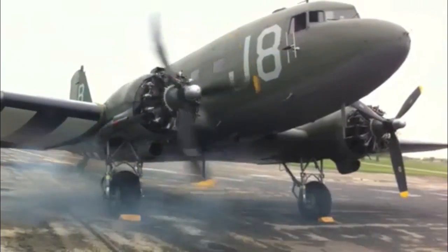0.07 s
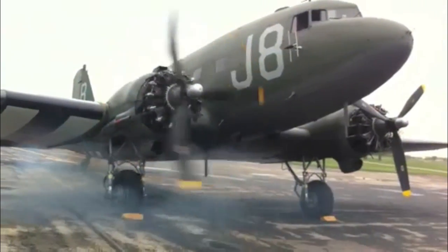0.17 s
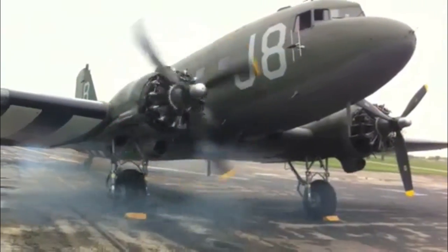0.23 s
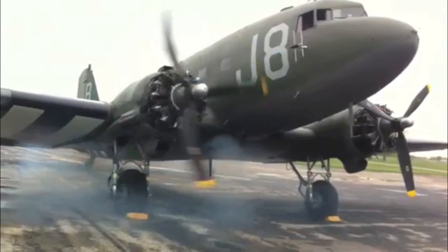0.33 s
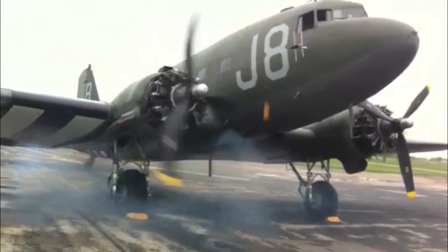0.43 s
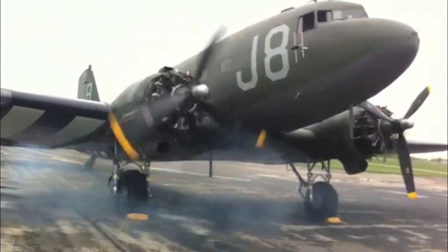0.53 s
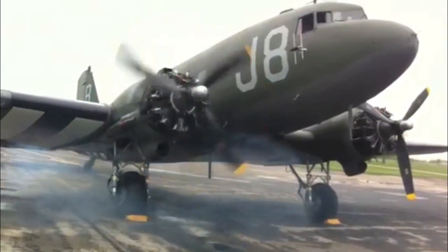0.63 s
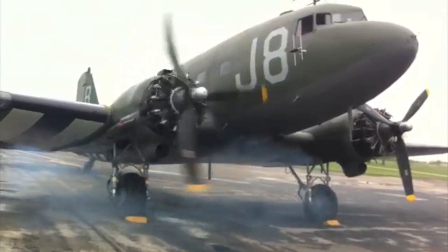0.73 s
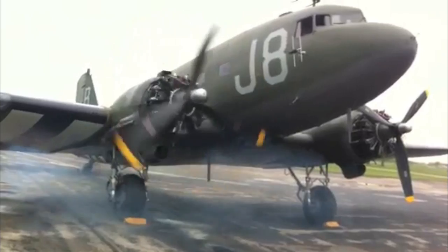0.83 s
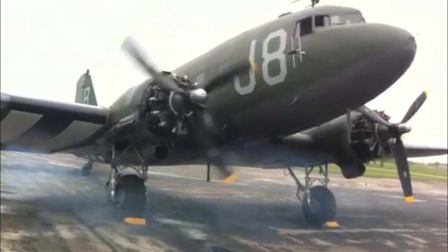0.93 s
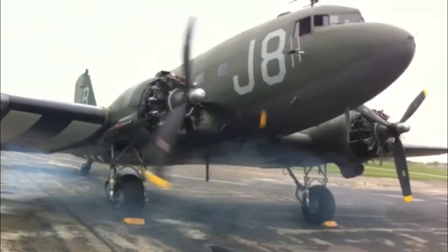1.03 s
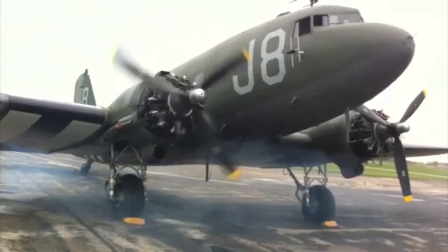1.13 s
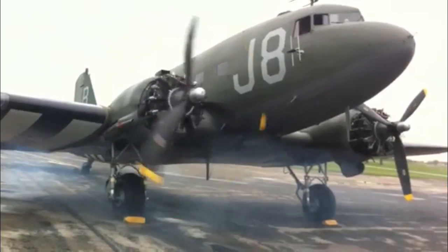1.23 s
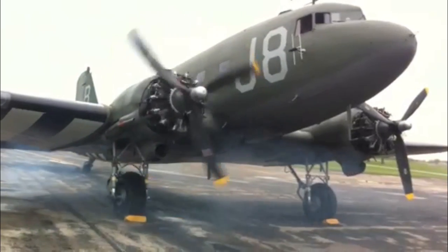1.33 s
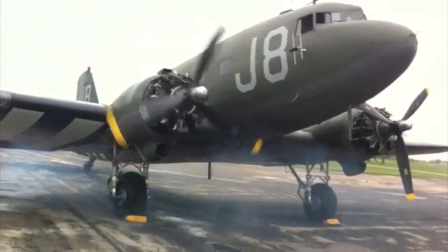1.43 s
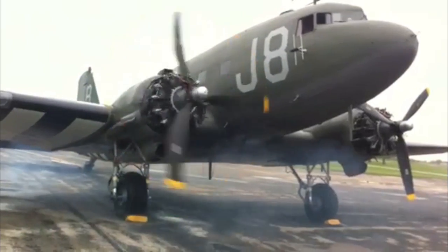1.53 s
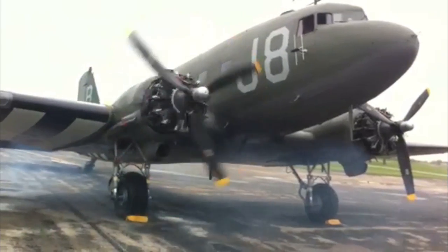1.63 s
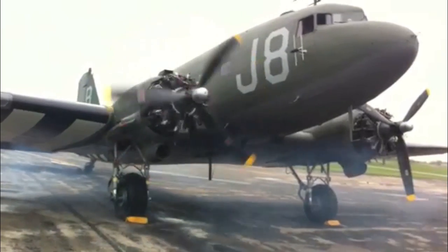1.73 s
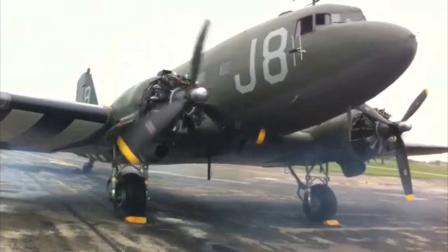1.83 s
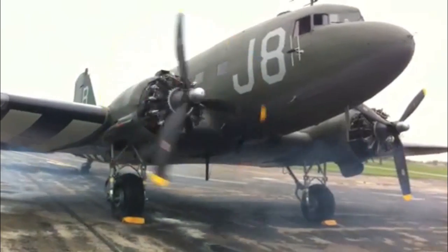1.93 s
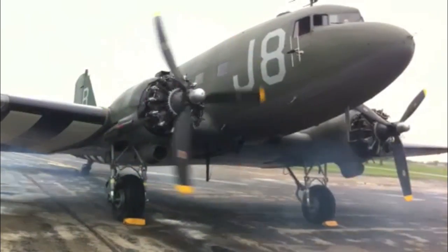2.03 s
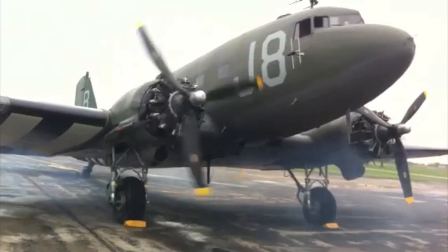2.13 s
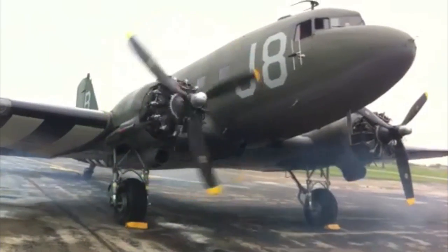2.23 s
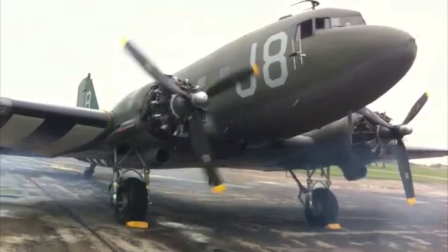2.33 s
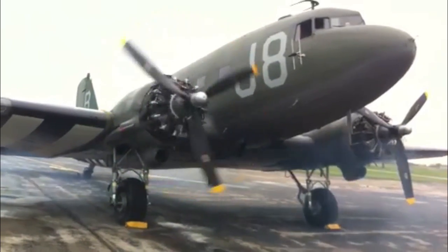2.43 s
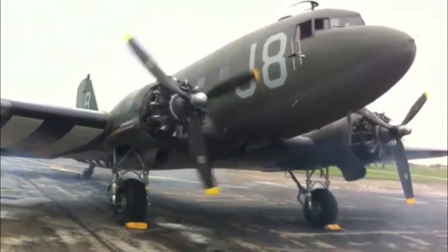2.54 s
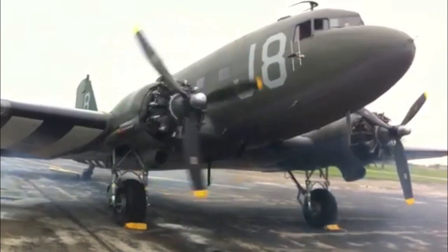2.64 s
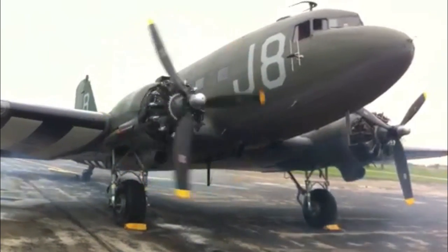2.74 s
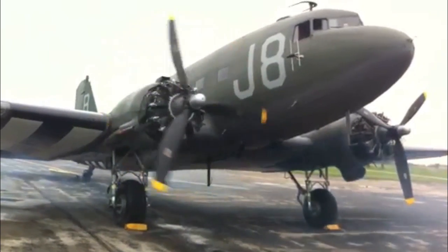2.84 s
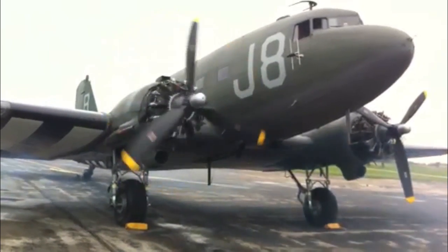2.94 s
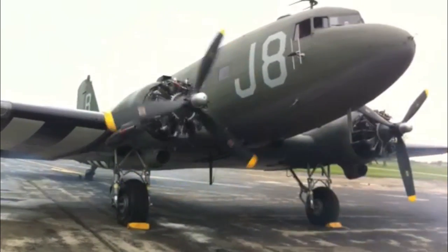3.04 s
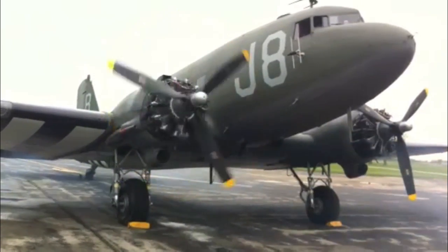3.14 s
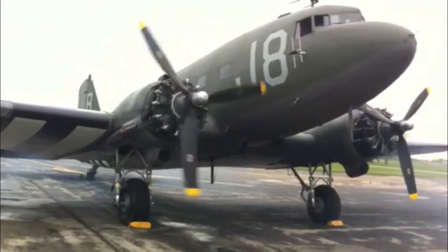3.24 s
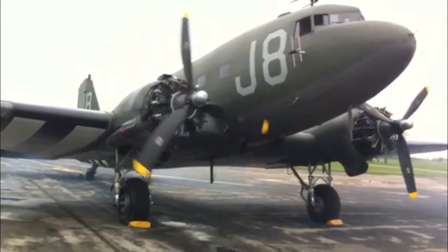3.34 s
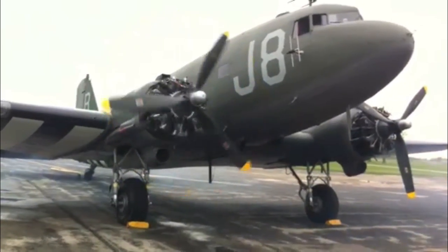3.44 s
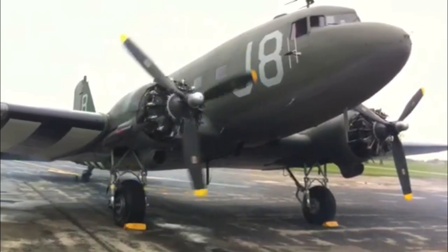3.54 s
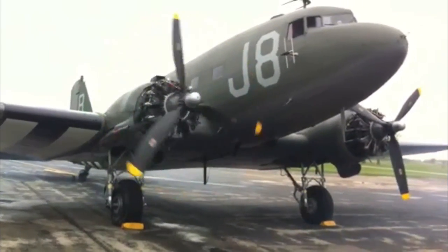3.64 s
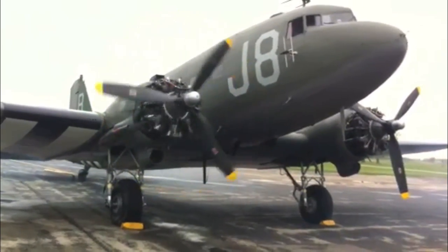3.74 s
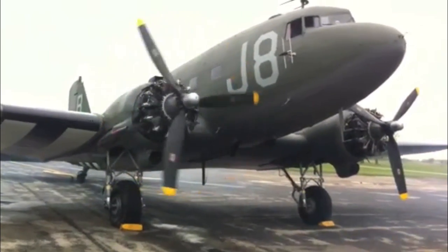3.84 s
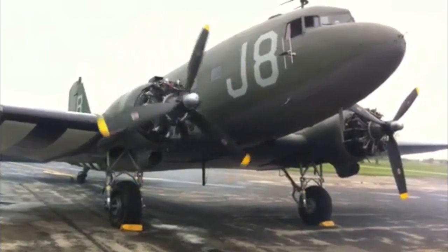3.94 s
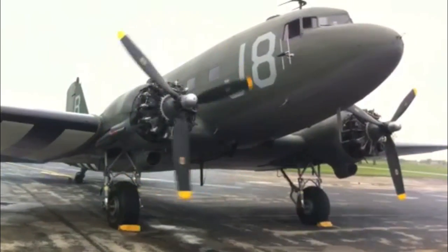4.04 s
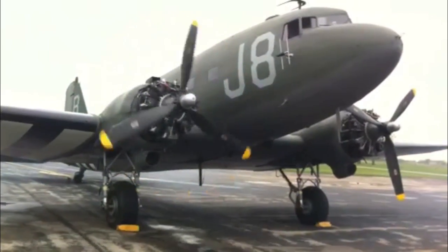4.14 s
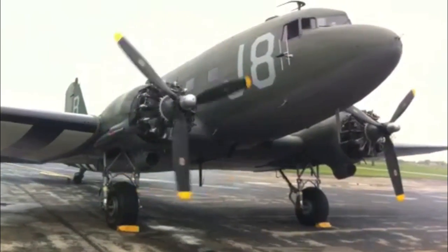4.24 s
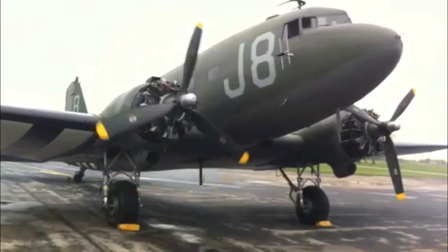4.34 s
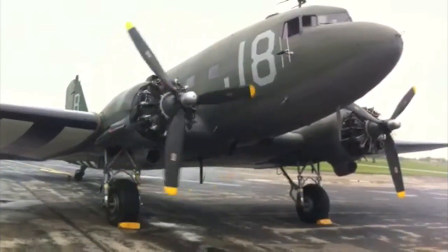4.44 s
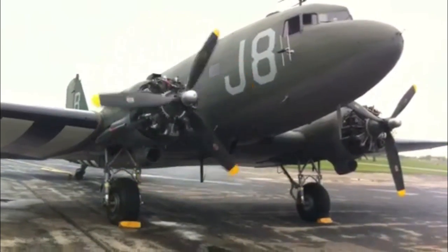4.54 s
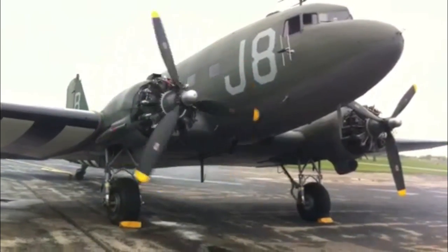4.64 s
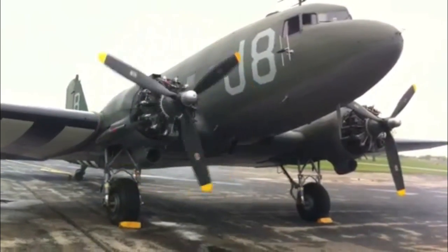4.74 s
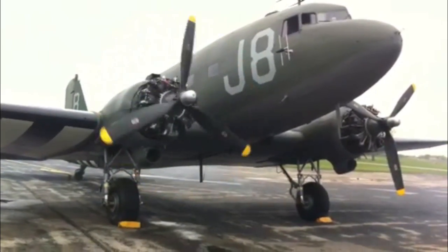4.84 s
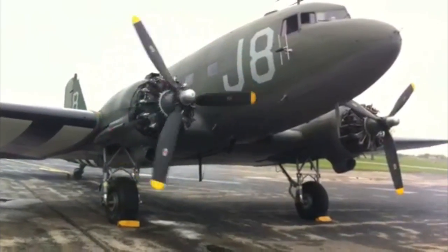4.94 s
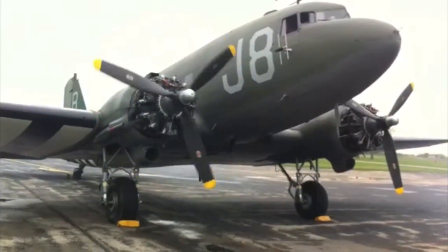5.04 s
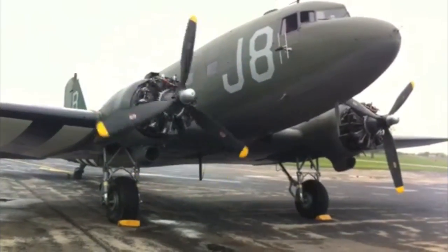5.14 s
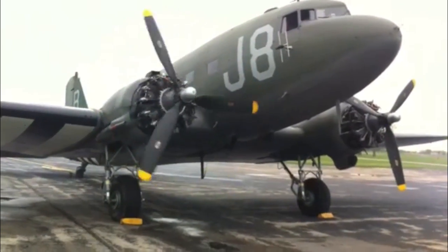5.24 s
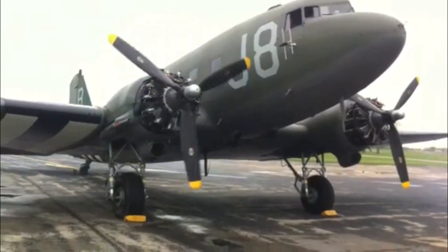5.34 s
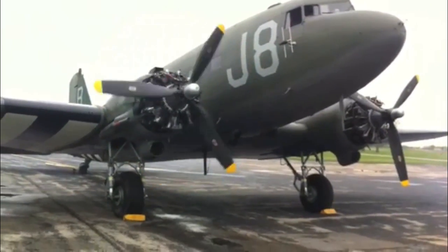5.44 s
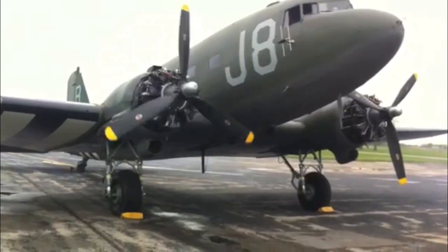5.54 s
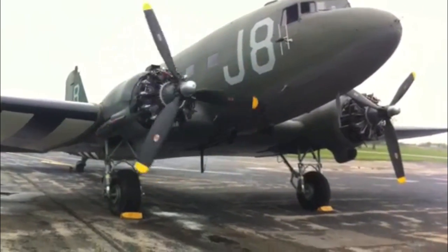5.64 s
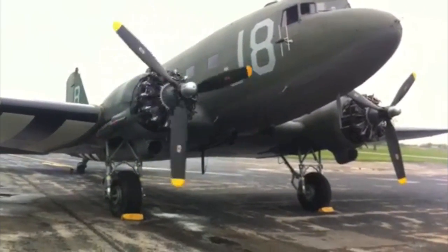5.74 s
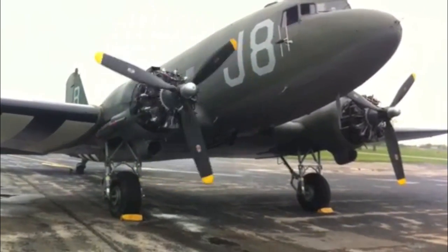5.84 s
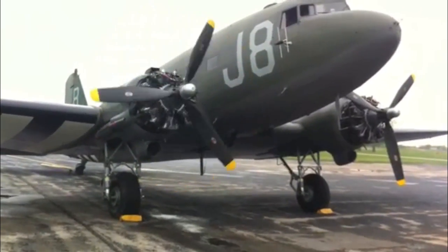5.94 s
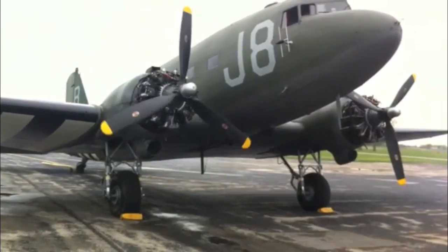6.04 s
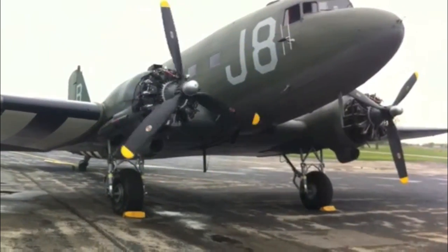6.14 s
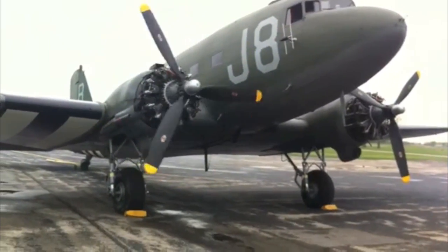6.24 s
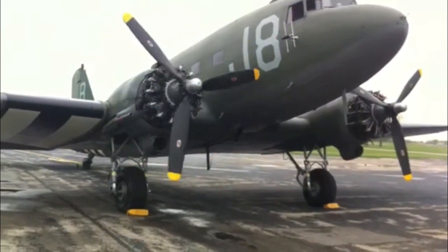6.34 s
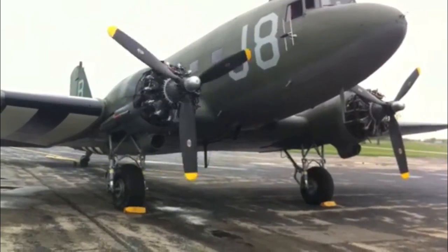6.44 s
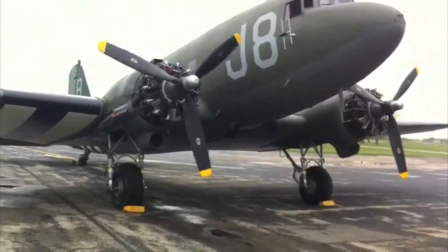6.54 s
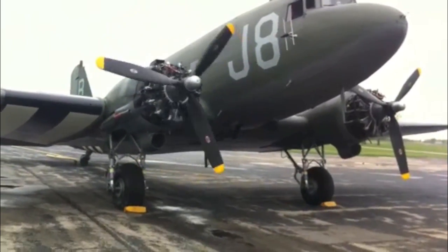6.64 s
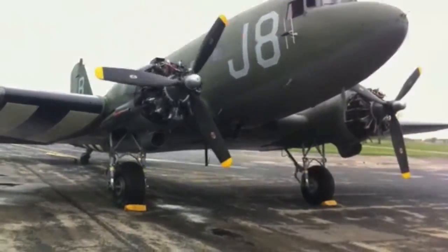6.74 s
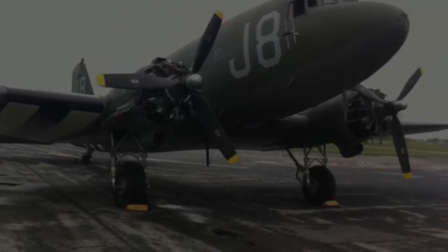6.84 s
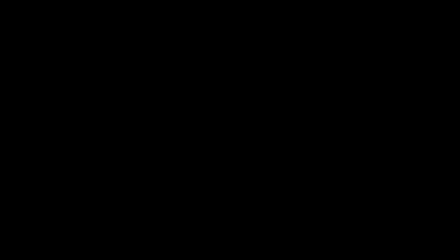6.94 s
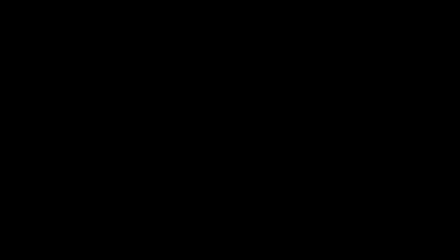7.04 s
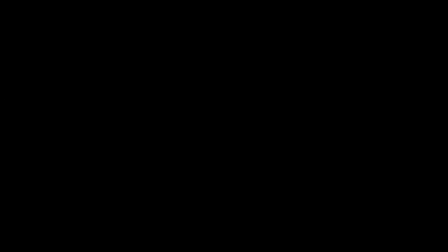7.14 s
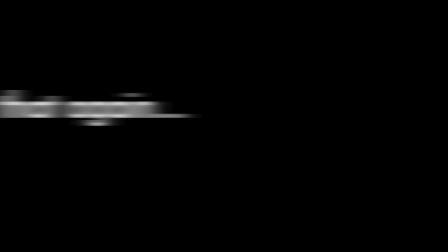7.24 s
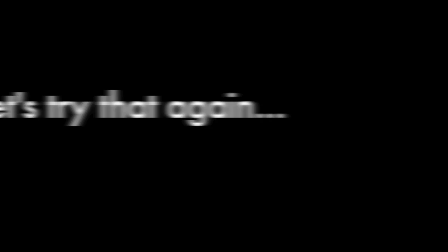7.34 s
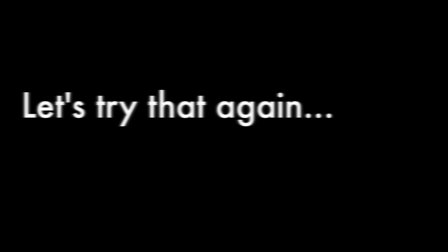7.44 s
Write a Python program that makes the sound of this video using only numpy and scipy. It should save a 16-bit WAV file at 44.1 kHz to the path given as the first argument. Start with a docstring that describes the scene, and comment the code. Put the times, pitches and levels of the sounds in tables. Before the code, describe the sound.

A piston aircraft engine fires with ragged pops, then winds down with slowing metallic clanks as wind buffets the microphone.

```python
"""Ragged exhaust blasts spit and boom as a radial aircraft engine catches for a second, then starves.
As it coasts down, its gears churn, steel impacts ring the casing ever more slowly, and a thin whistle
sinks. A fuel pump whines throughout, and the airframe's panels resonate and reflect all these sounds.
Turbulent wind buffets the microphone as the propeller comes to rest; then the sound fades out."""
import sys
import numpy as np
from scipy import signal
from scipy.fft import rfft, irfft
from scipy.io import wavfile
from scipy.ndimage import map_coordinates

SR = 44100
rng = np.random.default_rng(int(sys.argv[2]) if len(sys.argv) > 2 else 0)


def unload_audio(sound):
    """Save the sound as a 16-bit wav file, at the path given as the first command line argument."""
    columns = np.transpose(np.atleast_2d(sound))
    # keep every value between -1 and 1, then stretch to whole-number steps
    steps = np.round(np.clip(columns, -1, 1) * 32767)
    wavfile.write(sys.argv[1], SR, steps.astype(np.int16))


N = 329868
TIME = np.arange(N) / SR

# crankshaft rotation: t/s, speed/(turns per s)
CRANK_SPEED = [(0, 5.3), (0.4, 3.36), (0.65, 5.18), (1.1, 4.72), (1.7, 3.88), (2.5, 2.99), (3.3, 2.26),
               (4.1, 1.64), (4.8, 1.16), (5.4, 0.83), (6, 0.55), (7, 0.1)]
# noise of the turning engine: t/s, puff level/dB, gear churn level/dB
RUNNING_LEVELS = [(0, -28.5, -24.5), (.75, -30, -26), (1.22, -32.5, -29), (2, -37.5, -33),
                  (2.97, -41.5, -38), (4.05, -42.5, -45.5), (5, -47, -48), (6, -63, -57), (7, -56.5, -58)]
# responses of the exhaust pipe, the crankcase and a steel contact: f/Hz, level/dB
PIPE_SPECTRUM = [(50, -24), (80, -14), (130, -0.5), (180, 1), (270, -1.5), (400, -7), (550, -8.5),
                 (900, -13)]
CASE_SPECTRUM = [(300, -33), (750, -12.5), (1100, -4.5), (1500, -1), (1950, 0.5), (2700, -9.5), (3400, -30),
                 (6000, -37)]
TICK_SPECTRUM = [(2000, -10), (3300, -1), (5300, 3), (7200, -11), (9000, -5.5), (11000, -19),
                 (15500, -18.5)]


def exhaust_blasts(rise=0.0072, boom_decay=0.026, hiss_decay=0.023, tear_db=3):
    """Jet noise and pipe resonance: each firing booms in the pipe and leaves it as turbulent gas."""
    # cylinders that fire: t/s, duration/s, hiss level/dB, boom level/dB
    firings = [(0, 0.023, -20, -17.5), (0.074, 0.055, -22.5, -20.5), (0.17, 0.027, -17.5, -23.5),
               (0.244, 0.035, -30.5, -26), (0.296, 0.016, -18, -24), (0.335, 0.026, -18, -17.5),
               (0.466, 0.048, -25, -23.5), (0.545, 0.023, -18.5, -16), (0.59, 0.052, -19, -26),
               (0.656, 0.011, -26.5, -14), (0.905, 0.058, -21, -25.5), (0.931, 0.031, -23, -36)]
    # escaping gas: f/Hz, level/dB
    jet_spectrum = [(300, -9.5), (700, -26), (2200, -1), (3200, -9), (4400, 2), (5500, 7), (7200, -2.5),
                    (9300, 5), (11200, -6), (13000, -2.5), (15500, -7.5)]
    t = np.arange(SR // 4) / SR
    hiss_power, boom_power = np.zeros((2, N))
    for s, length, hiss_db, boom_db in firings:
        opening, after = np.minimum(t / rise, 1), np.maximum(t - length, 0)
        add(hiss_power, s, (amp(hiss_db) * opening * np.exp(-after / hiss_decay)) ** 2)
        add(boom_power, s, (amp(boom_db) * opening * np.exp(-after / boom_decay)) ** 2)
    jet = noise(jet_spectrum) * unit(amp(tear_db * wobble(139.9)))
    return np.sqrt(hiss_power) * jet + amp(-5) * np.sqrt(boom_power) * noise(PIPE_SPECTRUM)


def pipe_thumps(pipe_hz=172, rise=0.0064, overtone_db=-7, spread=0.14):
    """Damped oscillation: a hard firing shoves the gas in the pipe, which swings for a few cycles."""
    # hardest firings: t/s, level/dB
    shoves = [(0.024, -19.5), (.118, -19.5), (.176, -17), (0.337, -16.5), (.483, -20.5), (.558, -14.5),
              (.629, -15), (.683, -22.5), (0.916, -15.5), (.976, -19.5), (1.058, -16.5)]
    t, track = np.arange(SR // 12) / SR, np.zeros(N)
    phase = 2 * np.pi * pipe_hz * t
    for s, db in shoves:
        low, high = np.exp(spread * rng.standard_normal(2))
        swing = np.sin(phase * low) + amp(overtone_db) * np.sin(2 * phase * high)
        add(track, s, amp(db - 4) * swell(t, rise) * swing)
    return track


def puffs_and_gears(puff_depth=0.23, grit_db=1.5):
    """Modulated noise: the exhaust puffs seven times a turn; gears churn and hum at their mesh rate."""
    # churning gears: f/Hz, level/dB
    churn_spectrum = [(400, -9.5), (535, -2.5), (726, -4), (972, -4), (1300, -5.5), (1420, 2), (2630, -8),
                      (3060, -15), (5230, -7.5), (7440, -21.5), (8670, -16.5), (13500, -28.5),
                      (15500, -28.5)]
    speed, = curves(CRANK_SPEED)
    puff_db, churn_db = curves(RUNNING_LEVELS)
    turns = np.cumsum(speed) / SR
    strokes = 1 + puff_depth * np.cos(2 * np.pi * 7 * turns)
    puffs = amp(puff_db) * unit(coloured(rng.standard_normal(N) * strokes, PIPE_SPECTRUM))
    teeth = rng.standard_normal(N) * amp(grit_db * wobble(500))
    churn = amp(churn_db - 1) * unit(coloured(teeth, churn_spectrum))
    mesh_level = amp(churn_db - 12) * np.minimum(3.5 / speed, 1) ** 2
    return puffs + churn + mesh_level * fuzzy_tone(98 * speed, width_hz=20)


def backlash_impacts(full_speed=2.77, creep_speed=.95, body_db=3, detune=0.055):
    """Backlash: slack closes with an impact, hard in the gears and lightly in the valve train."""
    # the propeller's weight jerks against the gears and rebounds:
    # t/s, level/dB, ring f/Hz, relative body level/dB, relative tick level/dB
    gear_clanks = [(.098, -11.5, 1440, 4, -27), (.142, -10.5, 1490, -6.5, -22), (.316, -8, 1863, -5.5, -13),
                   (.456, -10.5, 1630, 1, -13), (.575, -11.5, 1455, 6, -16), (.896, -8, 1557, 3, -15),
                   (.979, -13, 1710, -10, -6), (1.095, -12, 1604, -1.5, -9.5),
                   (1.186, -11, 1597, -25, -8.5), (1.314, -13.5, 1630, 1, -12),
                   (1.33, -16.5, 1300, 1, -20.5), (1.414, -10, 1550, -4, -18.5),
                   (1.549, -12, 1620, 1.5, -12), (1.568, -17, 1340, 5, -12), (1.659, -13, 1680, 0, -15),
                   (1.804, -10.5, 1690, 2, -15), (1.923, -11.5, 1743, -5.5, -16),
                   (2.083, -11.5, 1650, 4, -16), (2.1, -14.5, 1345, -8, -20), (2.211, -14, 1820, -1, -13.5),
                   (2.386, -12, 1755, 2, -12), (2.409, -16, 1340, -2, -22), (2.529, -15, 1810, -1, -11.5),
                   (2.724, -12.5, 1740, -1, -12), (2.747, -13.5, 1440, -2, -22),
                   (2.887, -12.5, 1930, -15, -12.5), (3.108, -14, 1770, 3.5, -14),
                   (3.135, -18.5, 1355, 3, -21), (3.295, -13, 1710, -25, -14.5),
                   (3.553, -15, 1660, 1.5, -12.5), (3.583, -17, 1360, -2, -22),
                   (3.777, -13.5, 1504, -12, -13.5), (4.093, -17.5, 1786, 3.5, -13),
                   (4.133, -24, 1500, -14, -13), (4.381, -16.5, 1740, 0.5, -10),
                   (4.709, -25.5, 1480, -4, -9), (4.809, -19, 1760, 5.5, -12), (4.862, -23.5, 1390, 4, -18),
                   (5.235, -21.5, 1600, 4, -11.5), (5.334, -28.5, 2150, -5, -11),
                   (5.445, -25, 1600, 3, -18), (5.568, -28.5, 1810, -10, -12),
                   (5.797, -24.5, 1820, -2, -12), (6.001, -20, 1770, 3.5, -13), (6.112, -28, 1590, -3, -20),
                   (6.195, -38.5, 2800, -16, -9), (6.49, -31.5, 1490, -2, -18)]
    # valve slack closing on each turn:
    # crank angle/turns, level/dB, loss per halving of speed/dB, ring f/Hz, relative tick level/dB
    valve_clacks = [(.225, -18, 6, 1347, -16), (.294, -27, 1.5, 2106, -11.5),
                    (0.526, -25.5, 7.5, 1658, -22.5), (.63, -18, 5.5, 1577, -21),
                    (.73, -22.5, 6.5, 1556, -14), (.893, -19, 2, 1403, -14.5)]
    impacts = list(gear_clanks)
    for angle, db, loss_db, hz, tick_db in valve_clacks:
        for s, speed, (stray_db, pitch) in zip(*crank_passes(angle), rng.standard_normal((32, 2))):
            softer_db = loss_db * max(np.log2(full_speed / speed), 0)
            if speed > creep_speed:  # any slower and only single, sparse clanks are left
                impacts.append((s, db - softer_db + stray_db, hz * np.exp(detune * pitch), body_db, tick_db))
    return impacts


def clacks(rise=0.0028, scrape=0.003, snap_rise=0.0008, snap_decay=0.0087, body_rise=0.0073,
           ring_t60=.08, sink=.4, rattle_time=0.021, echo_t60=0.48):
    """Impact excitation: each blow snaps, rings the steel, stirs the casting and echoes off panels."""
    # modes of the gear housing: f/Hz, level/dB
    housing_modes = [(1525, -8), (2135, -14), (2480, -14), (2790, -15), (3700, -18.5)]
    # responses of the heavy casting and of the scattering airframe: f/Hz, level/dB
    body_spectrum = [(400, -14), (720, -18.5), (830, -4), (910, -3.5), (1080, -1), (1350, -2.5),
                     (2100, -10), (3000, -31)]
    echo_spectrum = [(400, -22), (900, -1.5), (1300, 7.5), (2000, -5), (3200, -21)]
    t = np.arange(SR // 8) / SR
    _, churn_db = curves(RUNNING_LEVELS)
    tail = amp(-13 - 60 * t / echo_t60) * (1 - np.exp(-t / rise))
    snap = np.minimum(t / snap_rise, 1) * np.exp(-t / snap_decay)
    # dispersion: short bending waves travel faster, so the ring starts high and sinks
    glide = 1 + sink * (rise - t / 2) / ring_t60
    knocks, ticks, rings, thuds, echoes = np.zeros((5, N))
    for s, db, hz, body_db, tick_db in backlash_impacts():
        _, knock_noise, contact_noise, echo_noise = rng.standard_normal((4, len(t)))
        # light contacts, barely above the churn, scrape on longer than hard ones
        chatter = scrape * min(amp(churn_db[round(s * SR)] + 16 - db) ** 2, 1.3)
        contact = swell(t, rise + chatter) * np.sqrt(rise / (rise + chatter))
        rattle = sum(swell(np.maximum(t - 2 * rise - late, 0), rise / 2) * np.exp(-late / rattle_time)
                     for late in rattle_time * rng.random(3))
        ring = amp(-7 - 60 * t / ring_t60) * np.sin(2 * np.pi * hz * t * glide)
        # a glancing blow that leaves the casting still rings the steel harder
        steel = amp(-7 - 0.28 * body_db) * ringing(t, housing_modes, t60=.065, scatter_db=4)
        add(rings, s, amp(db) * np.minimum(t / rise, 1) * (ring + steel))
        add(knocks, s - .001 - chatter, amp(db) * np.hypot(contact, amp(-9) * rattle) * knock_noise)
        add(ticks, s - .002, amp(db + tick_db) * (snap + amp(-9.5) * (contact + tail)) * contact_noise)
        add(thuds, s, amp(db + body_db) * swell(t, body_rise) * contact_noise)
        add(echoes, s, amp(db) * tail * echo_noise)
    case = rings + amp(1) * coloured(knocks, CASE_SPECTRUM) + coloured(thuds, body_spectrum)
    return case + amp(1.5) * coloured(ticks, TICK_SPECTRUM) + coloured(echoes, echo_spectrum)


def loose_part(rise=0.0046, scrape_db=-2):
    """Free vibration: a small loose steel part scrapes and jingles, about once a turn."""
    # strikes: t/s, level/dB
    strikes = [(2.828, -34), (3.224, -34), (3.698, -36.5), (4.272, -39), (4.661, -40), (4.722, -38),
               (5.06, -43)]
    modes = [(5110, -1.5), (5575, 1), (6000, -6)]  # f/Hz, level/dB
    t = np.arange(SR // 8) / SR
    rings, scrapes = np.zeros((2, N))
    for s, db in strikes:
        add(rings, s, amp(db) * np.minimum(t / rise, 1) * ringing(t, modes, t60=0.066, scatter_db=3))
        add(scrapes, s, amp(db + scrape_db) * swell(t, rise) * rng.standard_normal(len(t)))
    return rings + coloured(scrapes, TICK_SPECTRUM)


def whistle(flutter_db=4):
    """Narrow-band noise: an airy whistle flutters and sinks as the engine loses speed."""
    # falling pitch: t/s, f/Hz, level/dB
    glide = [(1.3, 15900, -56), (1.56, 15450, -43), (1.6, 14700, -42), (1.7, 14200, -41.5),
             (1.8, 13550, -42), (1.95, 12850, -52.5), (2.08, 12400, -45), (2.36, 11450, -61)]
    hz, db = curves(glide)
    present = (TIME > glide[0][0]) & (TIME < glide[-1][0])
    level = present * amp(db + 1.5 + flutter_db * wobble(44.9))
    return level * fuzzy_tone(hz + 110 * wobble(70), width_hz=780)


def fuel_pump(waver_db=-4, drift_depth=0.0044):
    """Tones over flow noise: the electric pump's whine wavers while fuel hisses through it."""
    # main whine: t/s, f/Hz, level/dB
    main_tone = [(3.2, 1443, -45), (3.73, 1435, -41.5), (3.9, 1375, -42.5), (4.1, 1399, -46),
                 (7, 1384, -55.5)]
    # fainter tones: f/Hz, width/Hz, level/dB
    overtones = [(4500, 200, -63), (4910, 160, -64)]
    # rushing fuel: f/Hz, level/dB
    flow_spectrum = [(220, -15), (453, -10), (663, -2), (1180, -7.5), (1370, -4.5), (1490, -6.5),
                     (1840, -10.5), (2980, -20.5), (4570, -13), (6570, -26), (8990, -25.5), (10400, -41),
                     (15500, -31)]
    hz, db = curves(main_tone)
    drift = 1 + drift_depth * wobble(5)
    faint = sum(amp(level) * fuzzy_tone(tone * drift, width) for tone, width, level in overtones)
    waver = amp(waver_db * wobble(6.6))
    whine = amp(db) * fuzzy_tone(hz * drift, width_hz=120)
    return waver * (whine + faint) + amp(-46) * noise(flow_spectrum)


def wind_strength(onset=0.057, attack=0.0062, release=0.011):
    """Incoherent addition: the powers of breeze and gusts sum to give one amplitude envelope."""
    # steady breeze: t/s, level/dB
    breeze = [(4.08, -38), (4.5, -41.5), (4.95, -40), (5.42, -26), (5.62, -27.5), (6, -35), (6.45, -40.5),
              (7, -40)]
    # gusts on top of it: t/s, duration/s, level/dB
    gusts = [(4.532, 0.1, -29), (4.965, 0.074, -26.5), (5.179, 0.081, -27.5), (5.349, 0.063, -24),
             (5.506, 0.13, -24.5), (5.659, 0.054, -26.5), (5.779, 0.048, -21.5), (5.882, 0.047, -28),
             (6.035, 0.056, -28.5), (6.148, 0.037, -31), (6.263, 0.048, -36)]
    breeze_db, = curves(breeze)
    power = (amp(breeze_db) * np.clip(1 + (TIME - breeze[0][0]) / onset, 0, 1)) ** 2
    t = np.arange(SR // 3) / SR
    for s, length, db in gusts:
        gust = amp(db) * np.minimum(t / attack, 1) * np.exp(-np.maximum(t - length, 0) / release)
        add(power, s, gust ** 2)
    return np.sqrt(power)


def wind(lump_db=2, eddies_per_s=62, eddy_hz=434, rise_cycles=0.25):
    """Turbulence: lumpy pressure on the microphone, brighter when strong, with single sharp eddies."""
    # sharpest eddies: t/s, level/dB, f/Hz
    sharp_eddies = [(4.582, -21, 190), (4.607, -21, 336), (4.612, -22, 380), (4.978, -16.5, 294),
                    (4.991, -17, 514), (5.016, -19.5, 446), (5.197, -18, 400), (5.214, -17.5, 596),
                    (5.255, -13, 640), (5.378, -12, 710), (5.531, -10, 290), (5.598, -19, 520),
                    (5.699, -9.5, 253), (5.787, -10.5, 330), (5.796, -14, 416), (5.805, -9, 362),
                    (5.82, -7.5, 286), (6.067, -21, 374)]
    # low buffeting: f/Hz, level/dB
    buffet_spectrum = [(50, -37.5), (85, -14.5), (125, -0.5), (190, 4), (280, -6), (400, -17.5),
                       (600, -25.5), (1000, -38.5)]
    level = wind_strength() * amp(lump_db * wobble(110) - 2.5)
    flutter = level ** 1.67 * amp(13.5) * noise([(200, 1.5), (320, 0.5), (700, -11.5), (2500, -37.5)])
    buffet = level * noise(buffet_spectrum)
    births = np.flatnonzero(rng.random(N) < eddies_per_s / SR)
    eddy_db = 20 * np.log10(level + 1e-9) + 0.5
    small_eddies = [(TIME[i], eddy_db[i] + 2.5 * force, eddy_hz * np.exp(0.35 * pitch))
                    for i, (force, pitch) in zip(births, rng.standard_normal((len(births), 2)))]
    t, eddies = np.arange(SR // 30) / SR, np.zeros(N)
    for s, db, hz in sharp_eddies + small_eddies:
        add(eddies, s, amp(db) * swell(t, rise_cycles / hz) * np.sin(2 * np.pi * hz * t))
    return buffet + flutter + amp(1.5) * coloured(eddies, [(70, -37), (140, -7), (200, 2.5), (1500, -3)])


def airframe(x, spread=.018, count=14, size=8192):
    """Resonance and reflection: the shell rings along; wing and fuselage mirror mostly the treble."""
    # sheet metal around the engine: f/Hz, width/Hz, level/dB
    shell_modes = [(530, 45, -10), (834, 30, -9), (1092, 35, -11), (1318, 35, -11), (1773, 40, -4),
                   (2137, 45, -6), (2810, 60, -8)]
    f = np.fft.rfftfreq(size, 1 / SR)
    shell = 1 + sum(amp(db) * 1j * f * width / (hz * hz - f * f + 1j * f * width)
                    for hz, width, db in shell_modes)
    delays = .002 + spread * (np.arange(count) + rng.random(count)) / count
    strengths = rng.choice([-1, 1], count) * np.exp(-2 * delays / spread)
    mirrors = np.exp(-2j * np.pi * np.outer(f, delays)) @ (strengths / np.linalg.norm(strengths))
    treble = 1j * f / (2500 + 1j * f)
    return signal.oaconvolve(x, irfft(shell * (1 + amp(-10) * mirrors * treble)))[:N]


def crank_passes(angle):
    """Rotation integrates speed: the times at which the crank passes an angle, and its speed at each."""
    speed, = curves(CRANK_SPEED)
    turns = np.cumsum(speed) / SR
    at = np.searchsorted(turns, np.arange(angle, turns[-1], 1))
    return TIME[at], speed[at]


def ringing(t, modes, t60, scatter_db, detune=.03):
    """Modal superposition: each blow weights and tunes the decaying modes a little differently."""
    hz, db = np.transpose(modes)
    force, shift = rng.standard_normal((2, len(hz)))
    phase = 2 * np.pi * rng.random(len(hz))
    tones = np.sin(2 * np.pi * np.outer(t, hz * np.exp(detune * shift)) + phase)
    return (tones @ amp(db + scatter_db * force)) * amp(-60 * t / t60)


def fuzzy_tone(hz, width_hz):
    """Quadrature modulation: a narrow band of noise around a pitch, rms 1."""
    phase = (2 * np.pi * (np.cumsum(hz * np.ones(N)) / SR % 1)).astype(np.float32)
    return unit(wobble(width_hz) * np.cos(phase) + wobble(width_hz) * np.sin(phase))


def coloured(x, points, size=4096):
    """Minimum-phase filtering by (f/Hz, level/dB) points, falling 24 dB an octave outside them."""
    f, db = np.transpose(points)
    octave, knots = np.log2(np.fft.rfftfreq(size, 1 / SR) + 1), np.log2(f)
    outside = np.abs(octave - np.clip(octave, knots[0], knots[-1]))
    gain = amp(np.interp(octave, knots, db) - 24 * outside)
    cepstrum = irfft(np.log(gain + 1e-6))
    cepstrum[1:size // 2] *= 2
    cepstrum[size // 2 + 1:] = 0
    return signal.oaconvolve(x, irfft(np.exp(rfft(cepstrum))))[:N]


def noise(points):
    """Filtered white noise, rms 1."""
    return unit(coloured(rng.standard_normal(N), points))


def wobble(rate):
    """Spline interpolation through random knots, rate of them a second."""
    knots = rng.standard_normal(int(N * rate / SR) + 4)
    steps = np.arange(0, len(knots) - 1, .125)
    return np.interp(TIME * rate, steps, map_coordinates(knots, [steps]))


def curves(rows):
    """Linear interpolation: one value per sample for each column after the time."""
    s, *columns = np.transpose(rows)
    return [np.interp(TIME, s, column) for column in columns]


def swell(t, rise):
    """A critically damped pulse, reaching 1 at t = rise."""
    return t / rise * np.exp(1 - t / rise)


def add(track, s, sound):
    """Superpose a sound on the track at time s."""
    part = track[max(round(s * SR), 0):][:len(sound)]
    part += sound[:len(part)]


def amp(db):
    return 10 ** (np.asarray(db) / 20)


def unit(x):
    return x / np.sqrt(np.mean(x ** 2) + 1e-20)


def scene():
    """Superposition: the engine sounds through its airframe; the wind acts directly on the microphone."""
    engine = exhaust_blasts() + pipe_thumps() + puffs_and_gears() + clacks() + loose_part()
    return (airframe(engine + whistle() + fuel_pump()) + wind())[None]


def record(dry, top_hz=15650):
    """Attenuation: a fade to silence and a steep low-pass band limit."""
    # output gain: t/s, level/dB
    fade = [(6.78, 0.5), (6.9, -4.5), (7.012, -5.5), (7.03, -100)]
    fade_db, = curves(fade)
    return signal.sosfilt(signal.ellip(12, .1, 90, top_hz, fs=SR, output="sos"), dry * amp(fade_db))


dry = scene()
out = record(dry)
unload_audio(out)
```